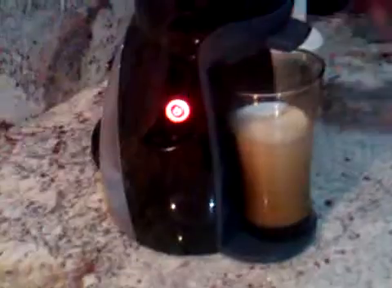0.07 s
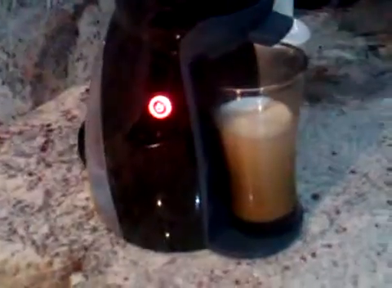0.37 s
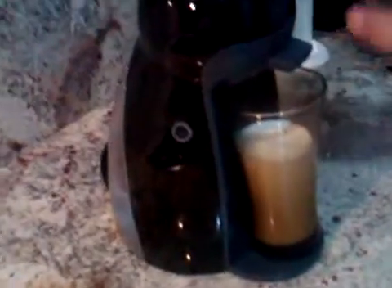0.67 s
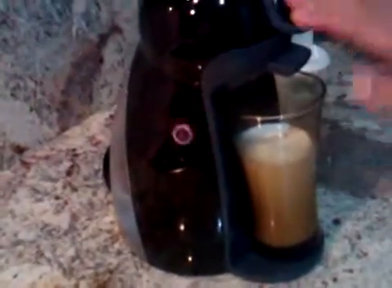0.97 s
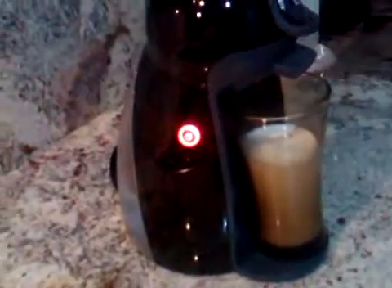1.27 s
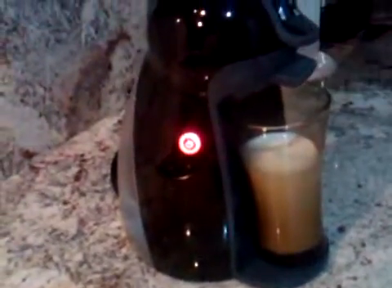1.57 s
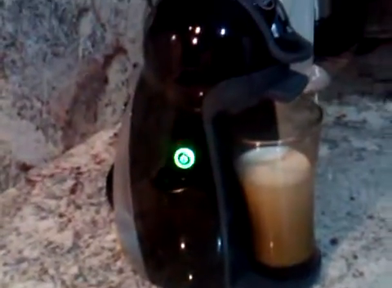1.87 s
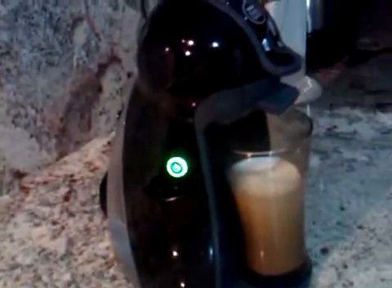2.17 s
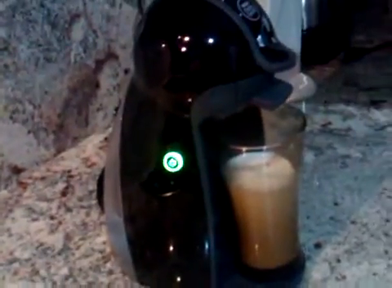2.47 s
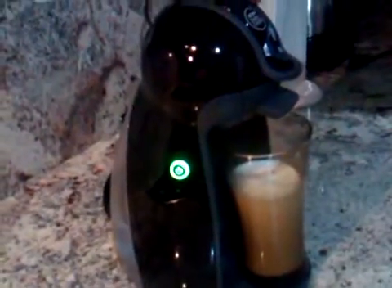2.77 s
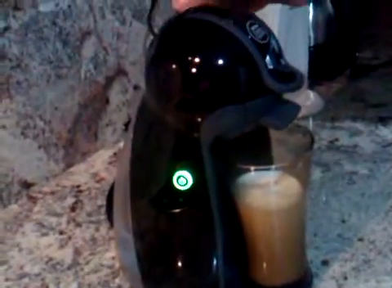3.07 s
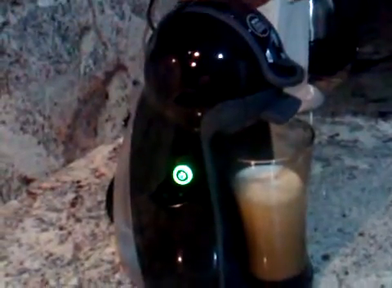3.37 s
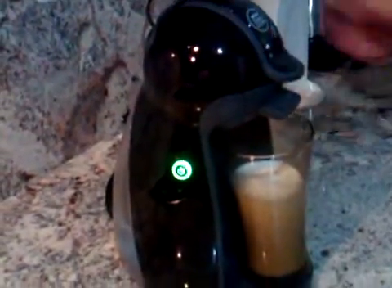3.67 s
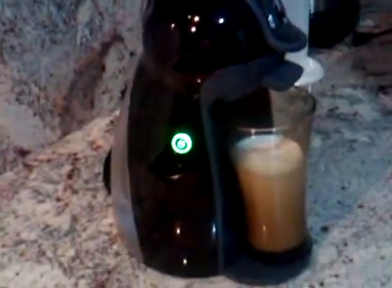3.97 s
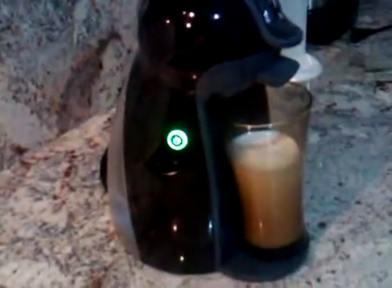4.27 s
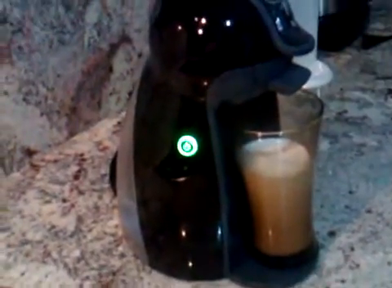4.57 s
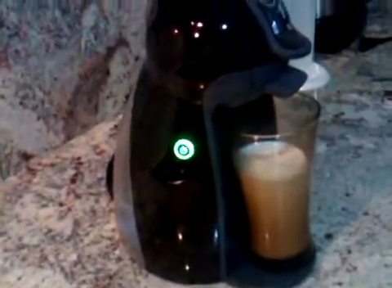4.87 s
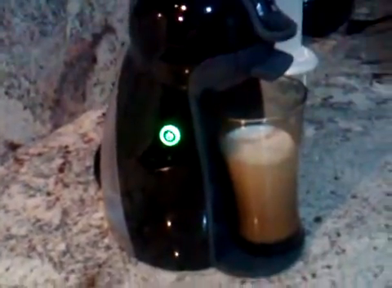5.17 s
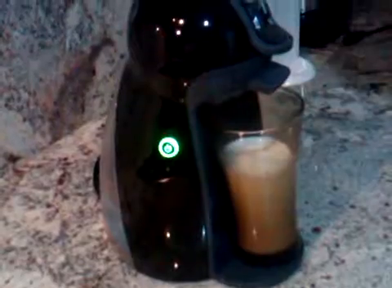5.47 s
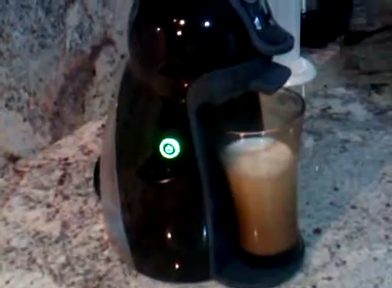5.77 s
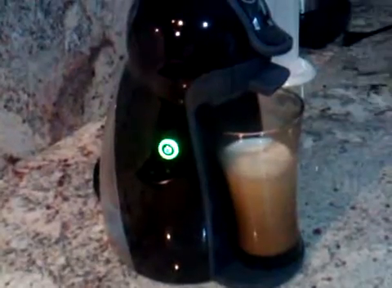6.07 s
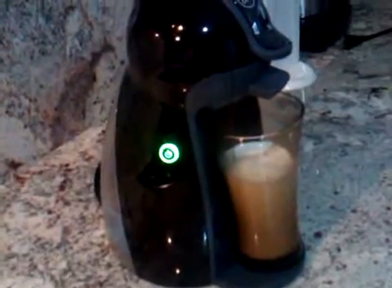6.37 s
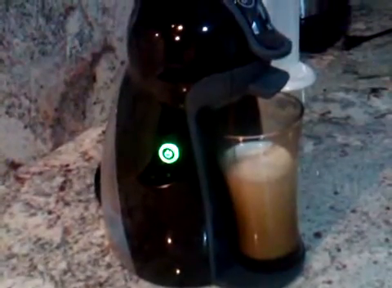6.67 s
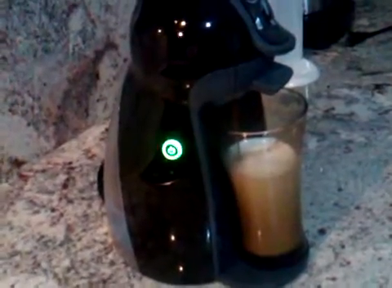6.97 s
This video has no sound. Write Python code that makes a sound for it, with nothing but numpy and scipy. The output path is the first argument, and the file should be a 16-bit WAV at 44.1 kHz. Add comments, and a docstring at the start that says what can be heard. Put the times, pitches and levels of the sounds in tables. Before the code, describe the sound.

A capsule coffee machine is handled on a stone counter: its plastic lever clacks, the capsule holder knocks, a catch snaps and the lid shuts with a loud, slightly booming crack. After two faint ticks the pump starts, rattling loosely before settling into a steady buzzing hum with a light fizz of water. A few small clicks come near the end. The microphone is close and the bare kitchen echoes.

```python
"""A capsule coffee machine's piston pump, buzzing on a stone counter in a bare, echoing kitchen.
First the lever, capsule holder, catch and lid clack shut, each a crack and a ring of plastic.
The mains-driven pump shakes loosely, then settles into a steady buzz as pressure builds;
the plastic clicks again near the end. One narrow-band microphone, close enough to overload
on the hardest snaps, picks up the machine and the echoes from the walls."""
import sys
import numpy as np
from scipy import signal
from scipy.fft import rfft, irfft
from scipy.io import wavfile
from scipy.ndimage import uniform_filter1d

SR = 44100
rng = np.random.default_rng(int(sys.argv[2]) if len(sys.argv) > 2 else 0)


def store_wav(level_fs):
    """Save 16-bit WAV to argv[1]."""
    pcm = np.round(np.clip(np.atleast_2d(level_fs), -1, 1) * 32767)
    wavfile.write(sys.argv[1], SR, pcm.T.astype(np.int16))


N = 309141
T = np.arange(N) / SR
MAINS_HZ = 60
PUMP_ON_S, PRIMED_S = 2.139, 2.3  # the pump starts; water reaches the piston
LOADED_S, LOADING_S = 4.44, 0.38  # when the pump has settled into its loaded buzz; how long that takes
PRESSURE_BUILD_S = 3.5


def gain_of(db):
    """Decibels to amplitude."""
    return 10 ** (np.asarray(db) / 20)


def unit_rms(x):
    """Scales to rms 1."""
    return x / np.sqrt(np.mean(x ** 2) + 1e-20)


def levelled(x, size=SR // 4):
    """Holds the slow level at rms 1."""
    power = uniform_filter1d(uniform_filter1d(x ** 2, size), size // 2)
    return x / np.sqrt(abs(power) + 1e-20)


def at_hz(points, hz):
    """Interpolates a table on a log-frequency axis."""
    f, value = np.transpose(points)
    return np.interp(np.log(hz + 1), np.log(f + 1), value)


def follow(rows, t):
    """The columns of a curve table at times t."""
    s, *columns = np.transpose(rows)
    return [np.interp(t, s, c) for c in columns]


def add(mix, s, sound):
    """Mixes a sound in at time s."""
    part = mix[max(round(s * SR), 0):][:len(sound)]
    part += sound[:len(part)]


def colour(x, db_at, size=4096):
    """Causal filter with the gain db_at(Hz)."""
    log_gain = np.log(gain_of(db_at(abs(np.fft.fftfreq(size, 1 / SR)))) + 1e-5)
    taps = np.fft.ifft(np.exp(np.conj(signal.hilbert(log_gain)))).real
    return signal.oaconvolve(x, taps[:size // 2])[:len(x)]


def shaped(x, spectrum):
    """x through a spectrum table, at rms 1."""
    return unit_rms(colour(x, lambda hz: at_hz(spectrum, hz)))


def ring(modes, swell_s):
    """Damped modes building up and dying after one impact."""
    t = T[:SR // 4]
    decay = sum(gain_of(db - 60 * t / max(t60, .005)) * np.sin(2 * np.pi * hz * t)
                for hz, db, t60 in modes)
    return decay * (1 - np.exp(-t / (swell_s + 1e-5)))


def crackle(t60, size=8192):
    """Many overlapping panel modes: a decaying burst of unit energy and even spectrum."""
    fade = gain_of(-60 * T[:size] / max(t60, .002))
    spectrum = rfft(rng.standard_normal(size) * fade)
    burst = irfft(spectrum / (abs(spectrum) + 1e-12))[:size // 2]
    return burst / np.linalg.norm(burst)


# Room tone at the microphone: (frequency [Hz], density [dB])
ROOM_SPECTRUM = [(20, 1), (60, -1.5), (110, 1), (160, -0.5), (450, -7.5), (900, -5.5), (2000, -15),
                 (7000, -25.5)]
def room_tone():
    """The quiet kitchen's steady, low noise."""
    return gain_of(-59) * shaped(rng.standard_normal(N), ROOM_SPECTRUM)


# Reverberation of the bare kitchen: (frequency [Hz], t60 [s])
KITCHEN_DECAY = [(80, 0.65), (250, 1.2), (800, 1.2), (2000, 1.1), (4000, 1.01), (7000, 0.9)]
def kitchen(x, build_s=0.0047):
    """Echoes from hard walls: dense random taps, each band dying at its own speed."""
    taps = rng.choice([-1., 1.], SR * 3 // 2) * (rng.random(SR * 3 // 2) < 1 / 10)
    hz, t, bands = signal.stft(taps, SR, nperseg=256)
    decay = gain_of(-60 * t / at_hz(KITCHEN_DECAY, hz)[:, None])
    tail = signal.istft(bands * decay, SR, nperseg=256)[1]
    tail *= 1 - np.exp(-T[:len(tail)] / build_s)
    return signal.fftconvolve(x, tail / np.linalg.norm(tail))[:N]


# Rubs at the machine: (time [s], length [s], level [dB], centre [Hz], width [octaves])
RUBS = [(0, 0.049, -40.5, 1005, 0.55), (0.573, 0.056, -49.5, 898, 0.87), (2, 0.054, -52, 1260, 0.66),
        (2.033, 0.021, -53, 3980, 1.1), (5.097, 0.11, -44.5, 6000, 0.58)]
def rubs(room_db=-5):
    """Short rubs and hisses: sparse grains in a band of frequencies."""
    out = np.zeros(N)
    for s, length, db, centre_hz, octaves in RUBS:
        count = int(length * SR)
        grains = rng.standard_normal(count) * (rng.random(count) < 1 / 10)
        rub = colour(grains, lambda hz: -10 * np.log10(1 + (np.log2((hz + 1) / centre_hz) / octaves)**4))
        add(out, s, gain_of(db) * unit_rms(rub) * signal.windows.tukey(count, .5))
    return out + gain_of(room_db) * kitchen(out)


def knocks(blows, modes, crack, ring_db, early_db, room_db, tick_db=-12, boom_db=0, boom_hz=200):
    """Blows on plastic: a dense crack and ringing modes, answered by the counter and the room."""
    out = np.zeros(N)
    tone = ring(modes, swell_s=.0005)
    # small panels radiate little bass
    tone = colour(tone, lambda hz: -10 * np.log10(1 + (220 / (hz + 1)) ** 4))
    tone *= gain_of(ring_db) / np.linalg.norm(tone)
    click = colour(signal.unit_impulse(len(tone)), lambda hz: at_hz(crack, hz))
    click /= np.linalg.norm(click)
    boomy = colour(click, lambda hz: boom_db / (1 + np.log2((hz + 1) / boom_hz) ** 4))
    for s, db, tilt, t60 in blows:
        # every blow radiates in its own directions, so each has its own echoes
        blow = gain_of(room_db) * kitchen(boomy)
        add(blow, 0, gain_of(tick_db) * click + tone)  # first contact, then the ring
        add(blow, 0, signal.fftconvolve(click, crackle(t60)))
        add(blow, 0, gain_of(early_db) * signal.fftconvolve(click, crackle(t60=0.18, size=16384)))
        force = gain_of(db) * np.sqrt(SR * t60 / np.log(1e6))
        add(out, s, force * colour(blow, lambda hz: tilt * np.log2(np.clip(hz, 200, 7000) / 2000)))
    return out


# Blows on the lever: (time [s], level [dB], tilt [dB/octave], crack t60 [s])
LEVER_HITS = [(.0325, -36, -5.5, 0.019), (.039, -16, 2, 0.033), (1.871, -40.5, 0, 0.043)]
# Its modes: (frequency [Hz], level [dB], t60 [s])
LEVER_RING = [(484, -17, 0.15), (766, -3.5, 0.1), (1126, -17, 0.18), (1470, -19, 0.12), (1850, -2, 0.051),
              (2620, -5, 0.056), (3840, -8, 0.038), (5610, -2, 0.028)]
# Its crack at the microphone: (frequency [Hz], density [dB])
LEVER_SPECTRUM = [(60, -47), (130, -30), (230, -17.5), (440, -9), (550, -17.5), (700, 3.5), (790, -0.5),
                  (1100, -10), (1850, -9), (2300, -15), (2750, -11.5), (4650, -26), (5700, -24),
                  (7000, -39), (9000, -68)]
def lever():
    """The plastic lever clacks and rings."""
    return knocks(LEVER_HITS, LEVER_RING, LEVER_SPECTRUM, ring_db=-4.5, early_db=-11, room_db=-7)


# Blows on the holder: (time [s], level [dB], tilt [dB/octave], crack t60 [s])
HOLDER_HITS = [(.6025, -24, -2, .05), (.699, -47, -2, 0.025), (1.939, -42.5, 5.5, 0.04)]
# Its modes: (frequency [Hz], level [dB], t60 [s])
HOLDER_RING = [(759, -7.5, 0.0587), (950, -9, 0.044), (1810, -6.5, 0.061), (3120, -10.5, 0.045),
               (3930, -19.5, 0.06), (4800, -22.5, 0.074), (6520, -17.5, 0.025)]
# Its crack at the microphone: (frequency [Hz], density [dB])
HOLDER_SPECTRUM = [(59, -67), (100, -34), (243, -18.5), (312, -20.5), (407, -15), (602, -31), (658, -6.5),
                   (890, 0), (1410, -15), (2050, -7), (7000, -28.5), (9100, -67), (15400, -120)]
def holder():
    """The capsule holder knocks lightly, with a short ring."""
    return knocks(HOLDER_HITS, HOLDER_RING, HOLDER_SPECTRUM, ring_db=-3.5, early_db=-14.5, room_db=-9.5)


# Blows on the catch: (time [s], level [dB], tilt [dB/octave], crack t60 [s])
CATCH_HITS = [(.7412, -31.5, 0, 0.033), (.7585, -13.5, 0, 0.042), (.7595, -4, 1.4, 0.0033),
              (6.1905, -29, -0.5, 0.07), (6.207, -45, -4, 0.07), (6.224, -33, -5.5, 0.041)]
# Its modes: (frequency [Hz], level [dB], t60 [s])
CATCH_RING = [(673, -32.5, 0.056), (1770, -11, 0.091), (2400, 4, 0.096), (2470, -0.5, .025),
              (2850, -2, 0.043), (3860, 3, .03), (5650, -41, 0.035), (6570, -19, 0.051)]
# Its crack at the microphone: (frequency [Hz], density [dB])
CATCH_SPECTRUM = [(60, -43), (150, -17.5), (400, -10), (520, -17), (690, -1.5), (950, -7.5), (1200, -9),
                  (2000, -5.5), (2750, 2.5), (3300, -8), (3900, -6.5), (4800, -16.5), (6700, -16),
                  (9000, -46)]
def catch():
    """The catch snaps in quick clusters of bright blows."""
    return knocks(CATCH_HITS, CATCH_RING, CATCH_SPECTRUM,
                  ring_db=-7.5, early_db=-5.5, room_db=-10, tick_db=-10)


# Blows on the lid: (time [s], level [dB], tilt [dB/octave], crack t60 [s])
LID_HITS = [(1.039, -19.5, 0.29, 0.16), (1.0447, -4, 0.92, 0.017), (1.048, -10.5, -0.59, 0.067),
            (1.053, -21, -0.51, 0.055), (6.1605, -26.5, 0.039, 0.039)]
# Its modes: (frequency [Hz], level [dB], t60 [s])
LID_RING = [(250, -10.5, 0.0382), (460, -11, 0.026), (715, -5, .04), (940, -5.5, 0.016), (1093, -3, 0.038),
            (1920, -4.5, 0.075), (2240, 4.5, 0.025), (3136, -6, 0.033), (3663, -6.5, 0.029),
            (4790, -12, 0.02), (5330, 2, 0.034), (6393, 5, 0.03), (7210, -10, 0.045)]
# Its crack at the microphone: (frequency [Hz], density [dB])
LID_SPECTRUM = [(30, -19), (60, -13), (105, -1), (165, -11), (265, 0), (350, -5.5), (480, -6.5), (600, -12),
                (740, 2), (1020, 3), (1400, -4.5), (2200, -4), (3900, -7.5), (6700, -8), (7600, -13.5)]
def lid():
    """The lid shuts hard enough to make the counter boom."""
    return knocks(LID_HITS, LID_RING, LID_SPECTRUM,
                  ring_db=-4, early_db=-7.5, room_db=-6.5, boom_db=4.5, boom_hz=185)


# The piston inside the machine: (time [s], impact lag [mains cycles], looseness [0-1])
PISTON_MOTION = [(2.13, 0.44, 0.77), (2.29, .39, 0.92), (2.35, .17, 1), (3.35, .14, 0.79),
                 (3.75, 0.13, .95), (4.22, 0.075, .82), (4.4, 0.09, .4), (5.35, 0, 0.29), (5.7, -0.04, 0.7),
                 (6.3, -0.083, 0.4), (7.01, -.21, .6)]
def strokes(mean, limp, scatter, jitter, delay=0, drift=0.635):
    """One impact a mains cycle, strong and weak in turn; looseness scatters force and timing."""
    cycle = np.arange(int(N / SR * MAINS_HZ))
    lag, loose = follow(PISTON_MOTION, cycle / MAINS_HZ)
    kick, slip, wander = rng.standard_normal((len(cycle), 3)).T
    turn = np.cos(np.pi * cycle + np.cumsum(drift * loose * wander))
    force = mean + limp * turn + scatter * np.sqrt(loose) * np.tanh(kick)
    hit_s = (cycle + lag + delay + jitter * loose * slip) / MAINS_HZ
    out = np.zeros(N)
    out[np.clip(np.round(hit_s * SR).astype(int), 0, N - 1)] = force
    return out


# Hum at the microphone, pump loose and loaded: (harmonic [x mains], level [dB])
LOOSE_HARMONICS = [(1, -0.5), (2, -17.5), (3, -9.5), (4, -7), (5, -13.5), (6, -9.5), (7, -17.5), (8, -20.5),
                   (10, -35), (11, -21.5), (13, -4.5), (14, -16), (15, -19), (18, -23.5), (20, -22),
                   (21, -16.5)]
LOADED_HARMONICS = [(1, 0.5), (2, -12.5), (3, -22.5), (4, -13.5), (5, -5.5), (6, -6.5), (7, -26),
                    (8, -18.5), (11, -18), (12, -7.5), (13, -2), (14, -13.5), (15, -19.5), (17, -21.5),
                    (18, -20.5), (19, -21), (20, -22), (21, -22)]
def hum(shell_db, shell_hz=760, shell_width_hz=130):
    """Mains harmonics shift balance under load; those near the shell's resonance swell with it."""
    loaded = np.clip((T - LOADED_S) / LOADING_S + 1, 0, 1)
    loose_db, loaded_db = dict(LOOSE_HARMONICS), dict(LOADED_HARMONICS)
    swell = gain_of(shell_db)
    tone = np.zeros(N)
    for k in sorted({*loose_db, *loaded_db}):
        level = (1 - loaded) * gain_of(loose_db.get(k, -30)) + loaded * gain_of(loaded_db.get(k, -30))
        near = 1 / (1 + ((k * MAINS_HZ - shell_hz) / shell_width_hz) ** 4)
        tone += level * (1 + near * (swell - 1)) * np.sin(2 * np.pi * (k * MAINS_HZ * T + rng.random()))
    return tone


def resonate(drive, modes, swell_s, room_db):
    """Impacts keep a set of resonances swinging at an even level."""
    body = signal.oaconvolve(drive, ring(modes, swell_s))[:N]
    return levelled(body + gain_of(room_db) * kitchen(body), size=SR // 8)


# Modes of the pump on its mounts: (frequency [Hz], level [dB], t60 [s])
MOUNT_MODES = [(92, -14, .1), (219.2, 0.5, 0.063), (270.5, -13.5, 0.14), (371.5, -2.5, 0.052),
               (478, -13.5, 0.068)]
def mount_shake():
    """Uneven strokes rock the pump on its mounts."""
    drive = strokes(mean=0, limp=0.55, scatter=0.94, jitter=0.017)
    return resonate(drive, MOUNT_MODES, swell_s=0.0041, room_db=-0.5)


# Modes of the machine's shell: (frequency [Hz], level [dB], t60 [s])
SHELL_MODES = [(746, -8.5, 0.034), (785.6, -4, 0.041), (833, -9, 0.043)]
def shell_rattle():
    """The strokes set the shell ringing."""
    drive = strokes(mean=0.11, limp=0.5, scatter=0.9, jitter=0.015)
    return resonate(drive, SHELL_MODES, swell_s=0.005, room_db=-1)


def chatter(drive, spectrum, t60, noise_db, room_db):
    """Every impact repeats the same short clack of the housing and adds a fresh spurt of noise."""
    clack = signal.oaconvolve(drive, crackle(t60))[:N]
    envelope = signal.oaconvolve(abs(drive), gain_of(-60 * T[:SR // 20] / t60))[:N]
    spurt = envelope * rng.standard_normal(N)
    direct = unit_rms(clack) + gain_of(noise_db) * unit_rms(spurt)
    return levelled(shaped(direct + gain_of(room_db) * kitchen(direct), spectrum))


# Clatter at the microphone: (frequency [Hz], density [dB])
CLATTER_SPECTRUM = [(60, -11), (150, 2), (420, -4), (580, -12), (950, -2.5), (1100, 1), (1250, -1),
                    (1550, 1.5), (1750, -4.5), (2030, 4.5), (2300, -6.5), (2750, -1), (3100, -9.5),
                    (3400, -8.5), (3950, -4.5), (4500, -13.5), (7500, -33)]
def piston_clatter(forward, back):
    """The piston strikes both ends of its travel."""
    return chatter(forward + back, CLATTER_SPECTRUM, t60=.025, noise_db=-3, room_db=-1.5)


# Fizz at the microphone: (frequency [Hz], density [dB])
FIZZ_SPECTRUM = [(500, -31), (3050, -4.5), (3370, 8.5), (3650, -7), (4050, -10), (4550, -10), (5000, 2),
                 (5300, -0.5), (5700, 2.5), (6300, 1.5), (6550, -1), (7100, -3.5), (8500, -31.5)]
def water_fizz(forward, back):
    """Water fizzes in spurts, mostly on the forward stroke."""
    return chatter(forward + .22 * back, FIZZ_SPECTRUM, t60=.024, noise_db=-2, room_db=0)


def dry_hammer(forward):
    """With no water to meet, the piston hammers sharply."""
    spectrum = [(300, -5), (1800, -6.5), (6700, -16), (8500, -14)]  # (frequency [Hz], density [dB])
    return chatter(forward, spectrum, t60=0.021, noise_db=0, room_db=-9)


# Strength of the shell's resonance: (time [s], level [dB])
SHELL_SWELL = [(2.35, -40), (2.58, -41), (3.79, -41), (5.42, -40), (5.57, -37), (6.21, -38.5), (7.0, -43)]
def pump(rise_s=0.0037, spin_up_s=0.095, usual_shell_db=-40.5):
    """Shake and rattle die down as the piston runs tighter; clatter and fizz grow with pressure."""
    tight = 1 - follow(PISTON_MOTION, T)[1]
    shell_db = follow(SHELL_SWELL, T)[0] - usual_shell_db
    running_s = T - PUMP_ON_S
    travel = np.clip(0.33 + running_s / spin_up_s, 0, 1)  # the stroke grows to full length
    pressure = np.clip(running_s / PRESSURE_BUILD_S, 0, 1)
    unprimed = travel ** 2 * np.clip((PRIMED_S - T) / 0.024, 0, 1)
    shake = gain_of(-41 - 17 * tight) * mount_shake()
    rattle = gain_of(-43 + 1.5 * shell_db - 8 * tight) * shell_rattle()
    forward = strokes(mean=0.7, limp=0.074, scatter=0.18, jitter=.008)
    back = strokes(mean=1.0, limp=0.093, scatter=0.31, jitter=0.01, delay=.31)  # delay in cycles
    clatter = gain_of(-45 + 1.53 * pressure) * piston_clatter(forward, back)
    fizz = gain_of(-52 + 3.5 * pressure + 2.5 * unprimed) * water_fizz(forward, back)
    hammer = gain_of(-41) * unprimed * dry_hammer(forward)
    body = travel * (gain_of(-38) * hum(shell_db) + rattle)
    impacts = np.sqrt(travel) * (shake + clatter + fizz)
    return (body + impacts + hammer) * np.clip(running_s / rise_s, 0, 1)


def scene():
    """Handling, room tone and pump, heard from one spot in the kitchen."""
    handling = lever() + holder() + catch() + lid()
    return (handling + room_tone() + rubs() + pump())[None]


def low_pass(x, edge_hz):
    """Steep low-pass."""
    return signal.oaconvolve(x, signal.firwin(801, edge_hz, window=("kaiser", 8), fs=SR)[None], "same")


def record(dry, ceiling=0.66, offset=0.002):
    """A narrow-band microphone clips the hardest snaps; the sound drops out just before the loudest."""
    narrow = low_pass(dry, 7270)
    dropout = np.interp(T, [1.008, 1.018, 1.036, 1.038], [1, 0, 0, 1])
    clipped = np.clip((narrow + offset) * dropout, -ceiling, ceiling)
    edge_fades = signal.windows.tukey(N, .0006)
    return low_pass(clipped * edge_fades, 16000)


dry = scene()
out = record(dry)
store_wav(out)
```